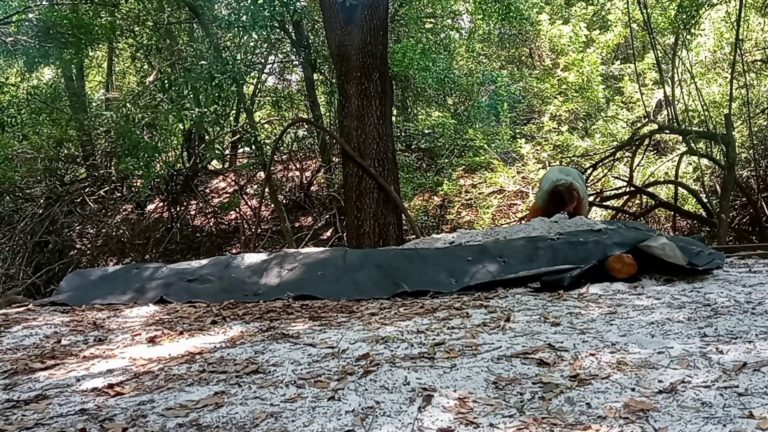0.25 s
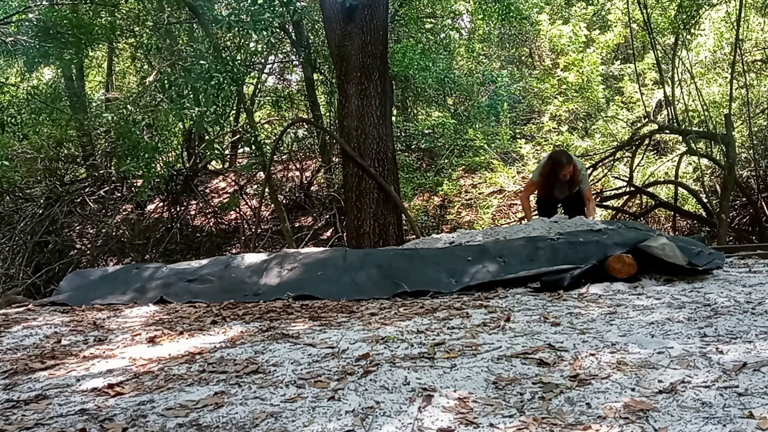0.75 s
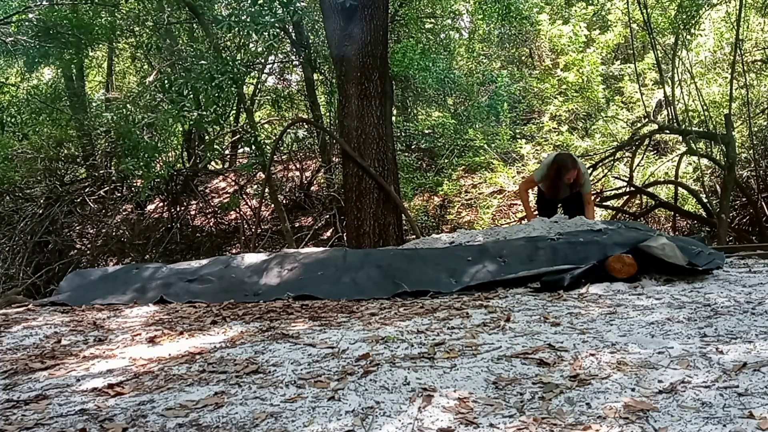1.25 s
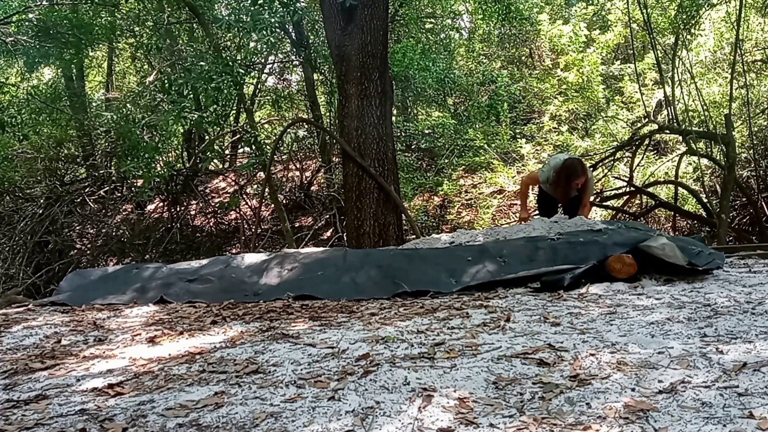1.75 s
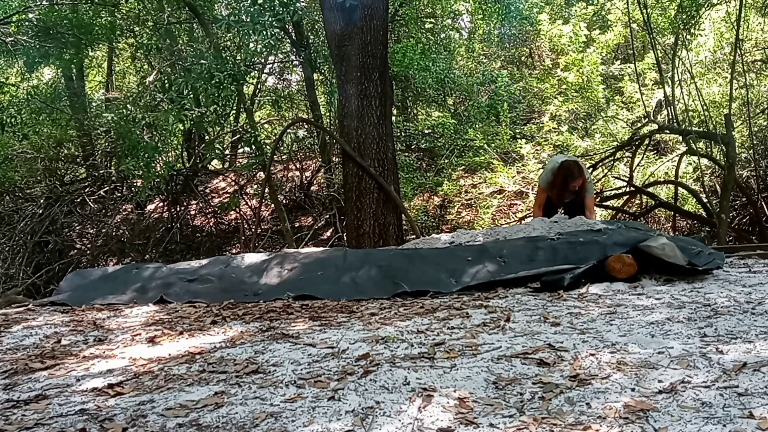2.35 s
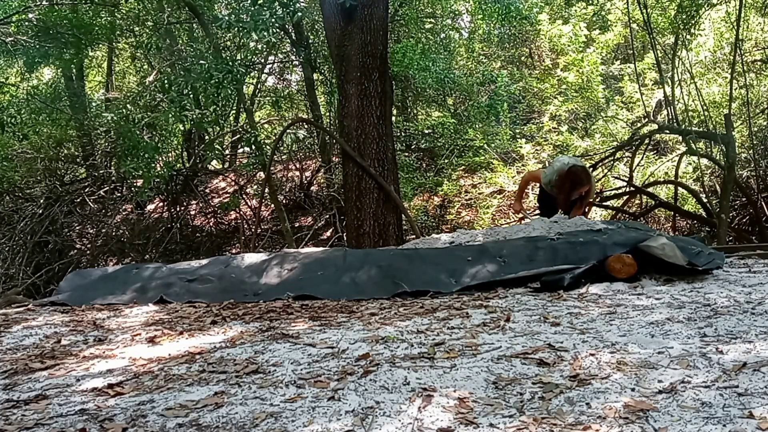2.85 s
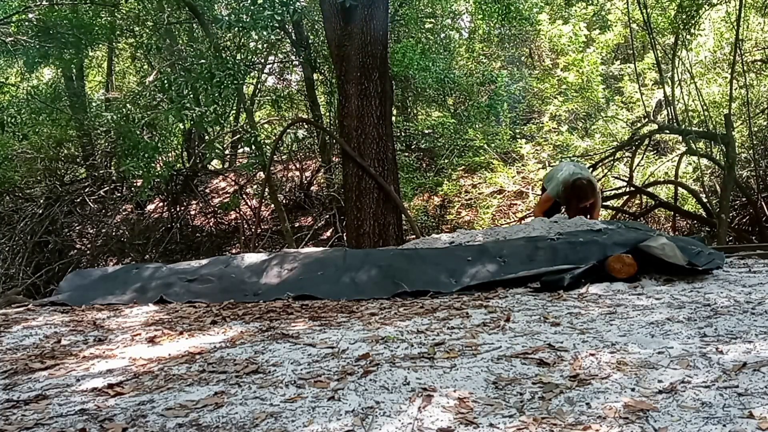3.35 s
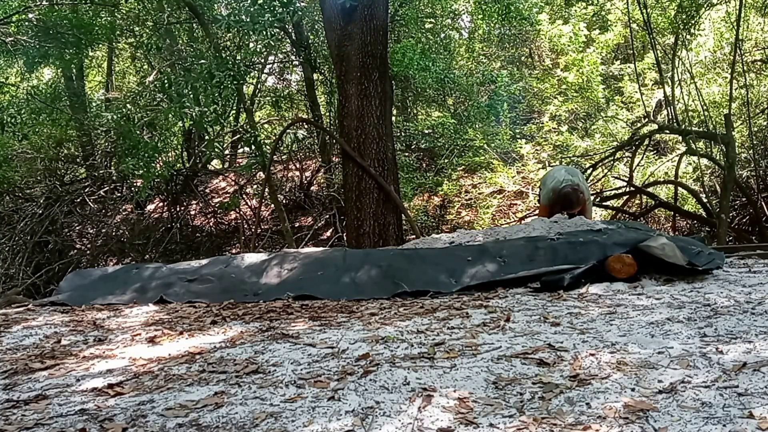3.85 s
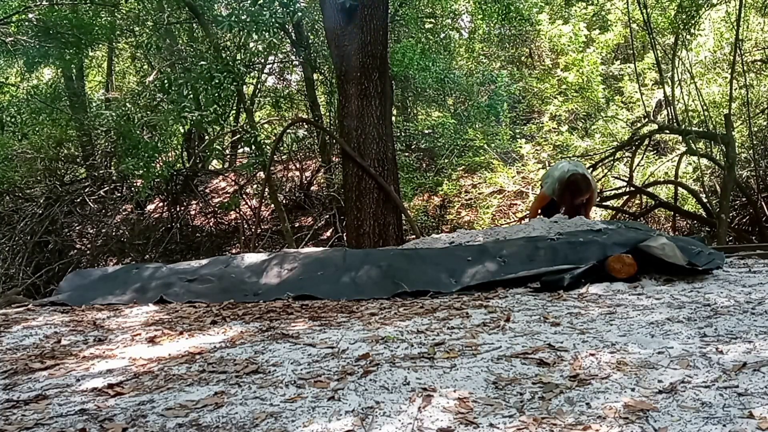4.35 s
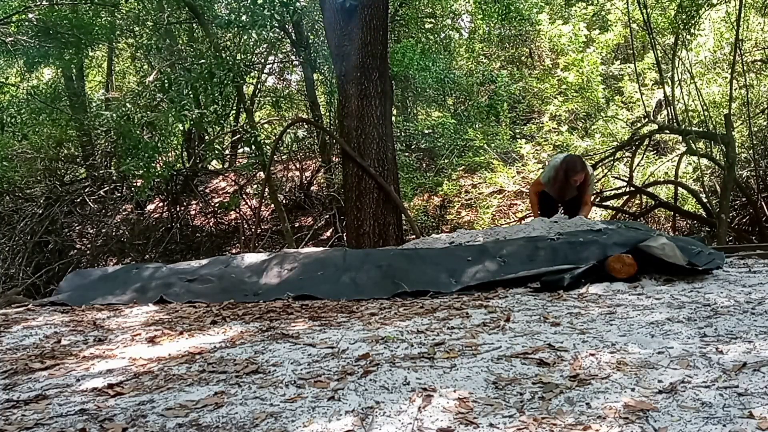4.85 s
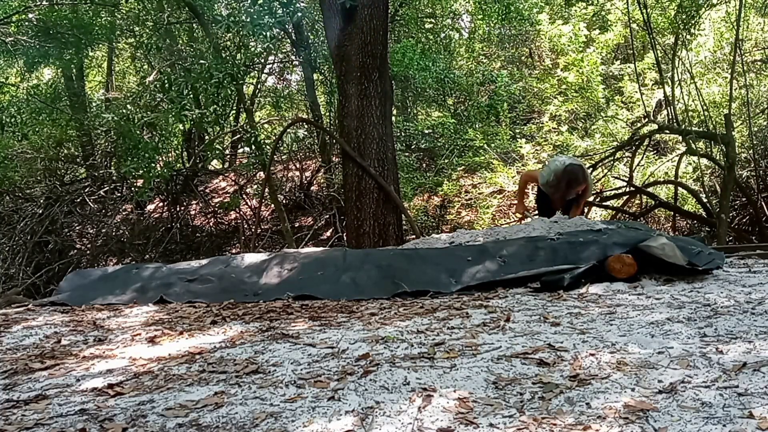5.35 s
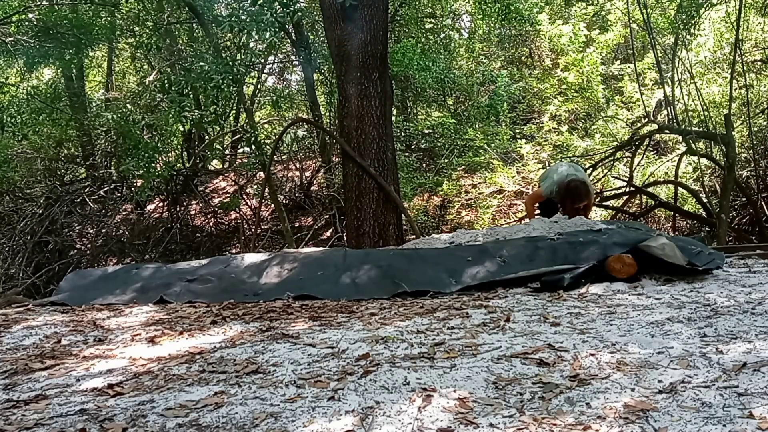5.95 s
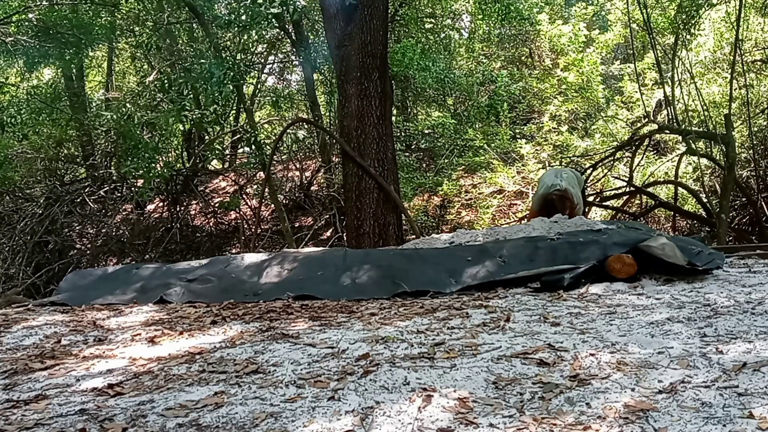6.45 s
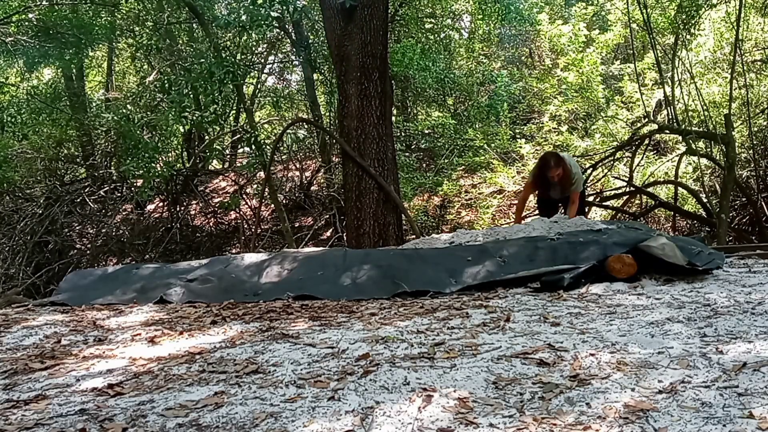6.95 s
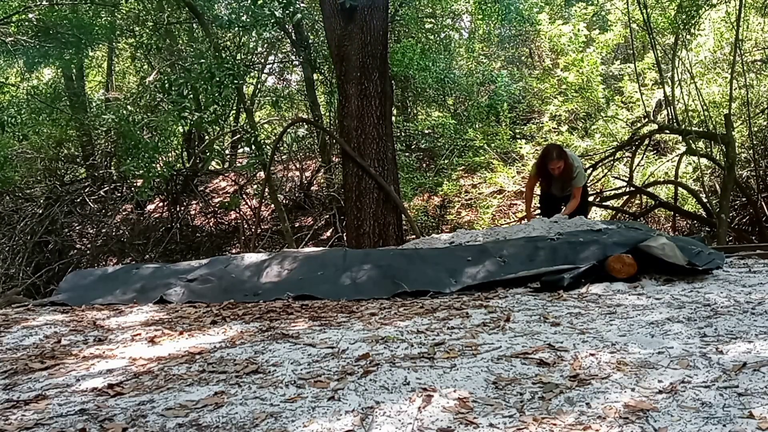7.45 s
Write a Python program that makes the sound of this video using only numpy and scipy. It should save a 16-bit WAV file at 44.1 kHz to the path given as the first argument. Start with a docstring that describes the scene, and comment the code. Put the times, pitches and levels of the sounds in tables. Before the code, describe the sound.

A quiet woodland with a thin, steady leaf hiss and a low, uneven distant rumble, containing a faint hum near 100 Hz and a blurred far traffic murmur. From 0 s, hands softly stir dry leaves and sand in short irregular strokes, each a papery scrape with fine crisp crackle. Tiny ticks occur at 0.3 and 0.9 s. At 1.17 s a bright tick coincides with a soft dull knock on the ground, followed by a stronger scrape around 1.3 s. Light rustling continues; ticks at 2.8 s and a sharp click at 3.06 s. Brushing is busiest from 3.4 to 3.8 s with small snaps, then sparser, with swishes near 4.1, 4.6, 5.5, 5.8 and 6.3 s. At 7.34 s the loudest dry twig snap cracks, brief with a tiny close echo, then a short scrape at 7.7 s. Centred, identical channels, distant microphone.

```python
"""Hands sweep dry leaves and sand: dense grains ring a hollow scrape and a crisp crackle, stroke by stroke.
Twigs and dry leaves snap as short rings, thrown back by the ground and a trunk.
One soft knock on the ground is a sum of dull modes.
Behind lie a far rumble with a hum and a murmur, and the canopy's steady hiss, all shaped from noise.
One microphone feeds both channels."""
import sys
import numpy as np
from scipy import signal
from scipy.io import wavfile
from scipy.ndimage import uniform_filter1d

SR = 44100
rng = np.random.default_rng(int(sys.argv[2]) if len(sys.argv) > 2 else 0)


def store_wav(level_fs):
    """Save 16-bit WAV to argv[1]."""
    pcm = np.round(np.clip(np.atleast_2d(level_fs), -1, 1) * 32767)
    wavfile.write(sys.argv[1], SR, pcm.T.astype(np.int16))


def amplitude_ratio(level_db):
    """Convert a level in decibels to the matching linear amplitude (field) ratio."""
    exponent = np.asarray(level_db, float) / 20
    return 10 ** exponent


N = 340263


def evened(x):
    """Scales to rms 1."""
    return x / np.sqrt(np.mean(x ** 2) + 1e-20)


def follow(rows):
    """Joins the columns of a curve by straight lines, one value a sample."""
    s, *columns = np.transpose(rows)
    return [np.interp(np.arange(N) / SR, s, column) for column in columns]


def read(points, hz):
    """Reads a spectrum on a log-frequency axis."""
    f, value = np.transpose(points)
    return np.interp(np.log(hz + 1), np.log(f + 1), value)


def wander(per_s):
    """Slow chance of rms 1: sines of random phase, per_s/8 to per_s cycles a second, the slow ones stronger."""
    t = np.arange(0, N / SR + .02, .005)
    rates_hz = np.geomspace(per_s / 8, per_s, 24)
    slow = sum(np.sin(2 * np.pi * (f * t + rng.random())) / np.sqrt(f) for f in rates_hz)
    return np.interp(np.arange(N) / SR, t, evened(slow))


def ring(hz, t60_s, rise_s, t):
    """A mode that builds up quickly and dies away."""
    shape = amplitude_ratio(-60 * t / t60_s) * (1 - np.exp(-t / rise_s)) ** 2
    return shape / shape.max() * np.sin(2 * np.pi * hz * t)


def coloured_noise(spectrum, size):
    """Random short-time spectra of a given colour, overlapped to rms 1."""
    hop = size // 4
    hz = np.fft.rfftfreq(size, 1 / SR)
    real, imag = rng.standard_normal((N // hop + 5, len(hz), 2)).T
    z = (real + 1j * imag) * amplitude_ratio(read(spectrum, hz)[:, None])
    return evened(signal.istft(z, nperseg=size, noverlap=size - hop)[1][:N])


def sweeping():
    """Grains ring the litter: lower hollow and scrape share one rub, the crackle has its own grains."""
    # Each row: centre in Hz, width in Hz, level in dB.
    hollow_modes = [(1810, 380, -12.5), (2920, 174, -2.5), (3100, 200, -2.5)]
    # Each row: centre in Hz, width in Hz, level in dB.
    scrape_modes = [(3980, 334, -1.5), (4870, 500, -4.5), (6610, 1560, -5.5)]
    # Each row: centre in Hz, width in Hz, level in dB.
    crackle_modes = [(8470, 1410, 2), (10660, 1480, 2), (13400, 4600, -3)]
    scrape_gain, crackle_gain, hollow_gain = effort()
    rub = grains(per_s=6000, spread_db=1.5)
    hollow = resonate(resonate(rub, hollow_modes), [(3050, 880, 0), (1890, 270, 0)])
    scrape = resonate(resonate(rub, scrape_modes), [(4900, 6200, 0)])
    cracks = grains(per_s=12000, spread_db=0.0)
    crackle = resonate(resonate(cracks, crackle_modes), [(10700, 7900, 0)])
    return hollow_gain * evened(hollow) - scrape_gain * evened(scrape) + crackle_gain * evened(crackle)


def effort():
    """Gains of scrape, crackle and hollow: the powers of the stirring and of every stroke add up."""
    # Litter shifting under knees and cloth. Each row: time in seconds, scrape level in dB.
    stirring = [(0, -65), (.5, -62), (.8, -64.5), (1.2, -60.5), (1.5, -63.5), (2.3, -61.5), (2.9, -62.5),
                (3.3, -61), (3.9, -64), (4.3, -66), (4.9, -64.5), (5.4, -64), (5.9, -62.5), (6.3, -65),
                (6.8, -66), (7.35, -63.5), (7.5, -61), (7.72, -58.5)]
    # Scrape, crackle, hollow of the stirring. Each row: level over the stirring in dB, rms wander in dB.
    stir_layers = [(0, 2), (8.5, .9), (-9.5, 2.5)]
    # Hand strokes. Each row: peak time in seconds, length in seconds, scrape level in dB,
    # crackle over scrape in dB, lower hollow over scrape in dB.
    strokes = [(0.33, 0.063, -61, 12, -14), (.58, 0.085, -66, 14.5, -1), (0.662, .05, -59.5, 5, -12),
               (0.87, 0.13, -57, 0, -6.5), (1.07, .06, -64.5, -2, -6), (1.165, 0.096, -58, 11.5, -4),
               (1.269, 0.083, -51, 0, -6), (1.324, 0.054, -52.5, 4.5, -2.5), (1.383, 0.044, -55.5, -8, -6),
               (1.611, 0.1, -56.5, 7, -2), (1.76, 0.098, -61.5, 8, -3), (1.87, 0.15, -59.5, 7, -9),
               (2.241, 0.071, -62, 9, -7), (2.406, 0.17, -59, 3.5, -10), (2.6, .09, -60.5, 8, -4.5),
               (2.709, .14, -69, -5, 0), (2.832, 0.11, -59.5, 7, -2.5), (3.05, 0.059, -62.5, 3, -3),
               (3.234, .06, -59.5, 2, -9), (3.464, .05, -58, -4, -12), (3.51, 0.061, -63, 0, 1),
               (3.56, 0.083, -54, 0, -4), (3.683, 0.06, -50.5, 0.5, -4), (3.747, .04, -59.5, 3, -3.5),
               (3.829, .08, -54, 2, -4), (4.01, 0.082, -70.5, 3, 2), (4.133, .07, -56, 7, -6.5),
               (4.3, .06, -72, 3, 4), (4.635, .07, -57, 2, -17), (4.946, 0.086, -62, -3, -5),
               (5.262, .05, -67.5, 0, 4), (5.515, 0.098, -57.5, 2, -9), (5.654, .06, -59.5, 3, -1.5),
               (5.79, 0.076, -53.5, 8.5, -5.5), (5.971, 0.098, -61.5, 2, -4), (6.138, .08, -65.5, 4, -1),
               (6.319, 0.064, -53.5, 5.5, -2), (6.47, 0.042, -55, 2.5, -5.5), (6.699, 0.13, -71, 7, -2),
               (7.019, .07, -65, 9, -3), (7.189, 0.065, -71, -1, 5), (7.412, .04, -65.5, 3, 0),
               (7.53, 0.054, -59, 3, -6), (7.635, 0.054, -63, 3, 1), (7.71, .04, -51.5, -5, -7)]
    rise_share, fall_share = 0.32, 0.38  # of a stroke's length, to 1/e of its peak power
    stir_db, t = follow(stirring)[0], np.arange(N) / SR
    power = amplitude_ratio([stir_db + over_db + wander_db * wander(9) for over_db, wander_db in stir_layers]) ** 2
    for peak_s, length_s, scrape_db, crackle_db, hollow_db in strokes:
        near = slice(max(0, round((peak_s - 2 * length_s) * SR)), round((peak_s + 2 * length_s) * SR))
        late_s = t[near] - peak_s
        share = np.where(late_s < 0, rise_share, fall_share)
        arch = np.exp(-(late_s / (length_s * share)) ** 2)
        power[:, near] += amplitude_ratio(scrape_db + np.array([[0], [crackle_db], [hollow_db]])) ** 2 * arch
    return np.sqrt(power)


def grains(per_s, spread_db):
    """Tiny cracks at random times; spread_db makes a few much larger than the rest."""
    size = amplitude_ratio(spread_db * np.minimum(rng.exponential(1, N), 5))
    return evened(size * rng.standard_normal(N) * (rng.random(N) < per_s / SR))


def resonate(x, modes):
    """Sums band-pass resonances, neighbours in opposite sign."""
    out = 0
    for k, (hz, width_hz, db) in enumerate(modes):
        b, a = signal.iirpeak(min(hz, .45 * SR), hz / width_hz, SR)
        out = out + (-1) ** k * amplitude_ratio(db) * signal.lfilter(b, a, x)
    return out


def snaps():
    """Each break: a bright ring of a few cycles and a duller crack, then echoes."""
    # Each row: time in seconds, level in dB, ring in Hz, dull part relative to the snap in dB.
    breaks = [(0.1531, -35, 8390, -14), (0.3211, -37, 9000, -18), (0.3262, -31, 9260, -15),
              (0.9234, -33, 9500, -14), (1.17, -22, 13800, -10), (1.7853, -36, 10300, -10),
              (2.761, -27.5, 11000, -10), (2.9347, -35, 9000, -14), (3.0563, -16.5, 9000, -11),
              (3.317, -34, 8410, -17), (3.4409, -26, 9700, -15), (3.446, -27.5, 8600, -13),
              (3.546, -26.5, 9600, -13), (4.2873, -30, 8800, -11), (4.4423, -34.5, 10300, -14),
              (5.3757, -35, 8600, -3), (5.9372, -38, 9490, -9), (6.805, -35.5, 8000, -20),
              (6.8466, -37, 10030, -11), (7.3374, -9, 9300, -13)]
    # Ground and trunk throw a snap back. Each row: delay in seconds, level in dB.
    echoes = [(.0009, -18), (.0026, -24), (.0103, -24.5)]
    out, t = np.zeros(N + SR), np.arange(400) / SR
    colour = rng.uniform(1.0, 1.03, (len(breaks), 2))
    for (s, level_db, hz, dull_db), (upper_ratio, dull_ratio) in zip(breaks, colour):
        bright = 0.88 * ring(hz, 0.00083, 0.0003, t)
        bright = bright + 0.48 * ring(min(1.42 * upper_ratio * hz, 15000), 0.0014, 0.00014, t)
        dull = amplitude_ratio(dull_db) * ring(5500 * dull_ratio, 0.00095, 0.00049, t)
        at = round((s + 0.0013) * SR)  # rings start 1.3 ms after the listed time
        out[at:at + len(t)] += amplitude_ratio(level_db) * (bright + dull)
    # small twigs radiate little bass
    out = signal.sosfilt(signal.butter(1, 1800, "high", fs=SR, output="sos"), out)
    paths = np.zeros(SR // 20)
    paths[0] = 1
    for delay_s, db in echoes:
        paths[round(delay_s * SR)] = amplitude_ratio(db)
    decay = amplitude_ratio(-36 - 60 * np.arange(len(paths)) / SR / 0.028)  # t60 28 ms
    undergrowth = decay * rng.standard_normal(len(paths))
    return signal.oaconvolve(out, paths + undergrowth)[:N]


def knock():
    """A push on soft ground rings a few dull modes."""
    # Each row: start in seconds, level in dB.
    knocks = [(1.1722, -31)]
    # Modes of the ground. Each row: frequency in Hz, relative level in dB, t60 in seconds.
    ground = [(180, -8, 0.028), (330, -2.5, 0.023), (520, -10, 0.026), (920, -11, 0.03), (1190, -16, 0.057),
              (2450, -3.5, .0012), (4170, -16, 0.00081)]
    out, t = np.zeros(N), np.arange(4000) / SR
    thud = sum(amplitude_ratio(db) * ring(hz, t60_s, .0001, t) for hz, db, t60_s in ground)
    for s, level_db in knocks:
        at = round(s * SR)
        out[at:at + len(t)] += amplitude_ratio(level_db) * thud
    return out


def rumble():
    """Distant traffic and wind: lumpy bass and wide upper noise, a hum and a murmur that wanders."""
    # Bass colour. Each row: frequency in Hz, relative density in dB per Hz.
    bass_colour = [(20, -18.5), (40, -24), (62, -1.5), (110, -5.5), (160, -14), (250, -24.5), (400, -74)]
    # Upper colour. Each row: frequency in Hz, relative density in dB per Hz.
    upper_colour = [(90, -31), (140, -5.5), (200, 0), (350, -3.5), (470, -14), (800, -19.5), (1300, -19),
                    (1750, -26.5), (2400, -35.5), (3500, -70)]
    # Slow drift. Each row: time in seconds, bass level in dB, upper level in dB.
    swell = [(0, -50, -54), (.6, -50.5, -53.5), (1.3, -50, -53.5), (1.8, -51, -53), (2.6, -49.5, -54.5),
             (3.6, -50.5, -56.5), (4.3, -50.5, -55.5), (5.2, -50.5, -56), (5.7, -47.5, -55.5),
             (6.3, -48.5, -54.5), (7.0, -46.5, -54.5), (7.72, -46, -57)]
    # Far hum. Each row: time in seconds, pitch in Hz, level in dB.
    hum_curve = [(0, 100, -51), (.32, 101.9, -55), (.55, 103.2, -46.5), (1.1, 104.8, -56.5),
                 (1.4, 91.5, -51), (2.3, 91, -51), (2.5, 98, -63.5), (3.0, 104, -51.5), (3.35, 95.5, -52),
                 (4.0, 95, -64), (4.4, 97.1, -54), (5.1, 95.6, -51), (5.4, 99.8, -65), (5.55, 97.8, -48.5),
                 (6.0, 96.8, -50.5), (6.96, 99, -51), (7.25, 97, -58), (7.72, 99.6, -54)]
    # Murmur of far traffic. Each row: time in seconds, level in dB.
    murmur_curve = [(0, -63.5), (.4, -58.5), (.56, -56.5), (.8, -62.5), (1.08, -56), (1.19, -55),
                    (1.26, -57), (1.5, -63.5), (1.9, -61), (2.3, -58.5), (3.1, -60.5), (4.1, -62.5),
                    (4.5, -60), (4.95, -67), (5.15, -62.5), (5.6, -60), (6.5, -64.5), (7.72, -61.5)]
    gusts_per_s = 8
    bass_db, upper_db = follow(swell)
    bass = amplitude_ratio(bass_db + 2 * wander(gusts_per_s)) * coloured_noise(bass_colour, size=4096)
    upper = amplitude_ratio(upper_db + 1.4 * wander(gusts_per_s)) * coloured_noise(upper_colour, size=4096)
    hum_hz, hum_db = follow(hum_curve)
    hum = amplitude_ratio(hum_db) * fuzzy_tone(hum_hz, width_hz=12.2, steady=0.52)
    murmur_db = follow(murmur_curve)[0] + 1.5 * wander(6)
    murmur_hz = 839 + 60.02 * wander(6)
    murmur = amplitude_ratio(murmur_db) * fuzzy_tone(murmur_hz, width_hz=435, steady=0)
    return bass + upper + hum + murmur


def fuzzy_tone(hz, width_hz, steady):
    """A tone on the curve hz: its strength and phase drift at the pace of width_hz around a steady part."""
    r = np.exp(-np.pi * width_hz / SR)
    drift = rng.standard_normal(N) + 1j * rng.standard_normal(N)
    drift = signal.lfilter([1], [1, -2 * r, r * r], drift)
    drift = steady + drift / np.sqrt(np.mean(abs(drift) ** 2))
    return evened((drift * np.exp(2j * np.pi * np.cumsum(hz) / SR)).real)


def canopy():
    """Smooth steady hiss of many far leaves, as coloured noise."""
    # Each row: frequency in Hz, relative density in dB per Hz.
    colour = [(1060, -38), (1800, -17), (2450, -12.5), (3070, -7.5), (3480, -16), (3920, -17), (4250, -4),
              (7440, -0.5), (8360, 7), (14900, -5.5), (15600, 3)]
    level_db = -55
    return amplitude_ratio(level_db) * coloured_noise(colour, size=1024)


def uneven_bands(x, patch_hz, patch_s):
    """Makes band levels uneven: random gains in patches of frequency and time."""
    # Each row: frequency in Hz, rms depth in dB.
    depth = [(150, 2.2), (500, 3.4), (1000, 3.5), (2000, 2.6), (3200, 3.6), (4500, 2.8), (6500, 1.7),
             (15000, .9)]
    hz, t, z = signal.stft(x, SR, nperseg=1024, noverlap=768)
    patches = rng.standard_normal(z.shape[::-1]).T
    for _ in range(2):
        patches = uniform_filter1d(patches, max(1, round(patch_hz / hz[1])), 0)
        patches = uniform_filter1d(patches, max(1, round(patch_s / (t[1] - t[0]))), 1)
    depth_db = read(depth, hz)[:, None]
    keep_power_db = -depth_db ** 2 * np.log(10) / 20  # holds the mean power of Gaussian dB swings
    z = z * amplitude_ratio(depth_db * evened(patches) + keep_power_db)
    return signal.istft(z, SR, nperseg=1024, noverlap=768)[1][:N]


def scene():
    """All sources on two equal channels; uneven band levels apply to the bed, not to snaps and knock."""
    bed = uneven_bands(sweeping() + rumble() + canopy(), patch_hz=100, patch_s=.045)
    return np.tile(bed + snaps() + knock(), (2, 1))


def top_cut(x):
    """Nothing passes above the cut-off."""
    return signal.sosfilt(signal.butter(12, 16820, fs=SR, output="sos"), x)


def record(dry):
    """The microphone drops the deepest bass; a steep low-pass limits the band."""
    thin = signal.sosfilt(signal.butter(2, 50, "high", fs=SR, output="sos"), dry)
    edge = signal.firwin(1023, 15720, window=("kaiser", 9), fs=SR)
    mix = signal.oaconvolve(thin, edge[None], "same")
    return top_cut(mix)


dry = scene()
out = record(dry)
store_wav(out)
```